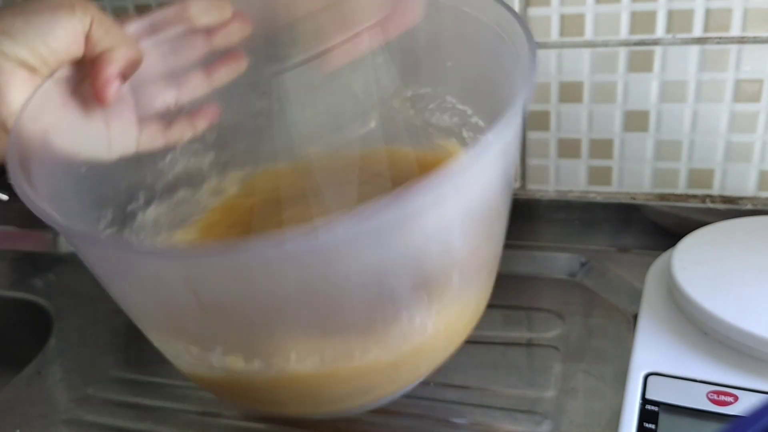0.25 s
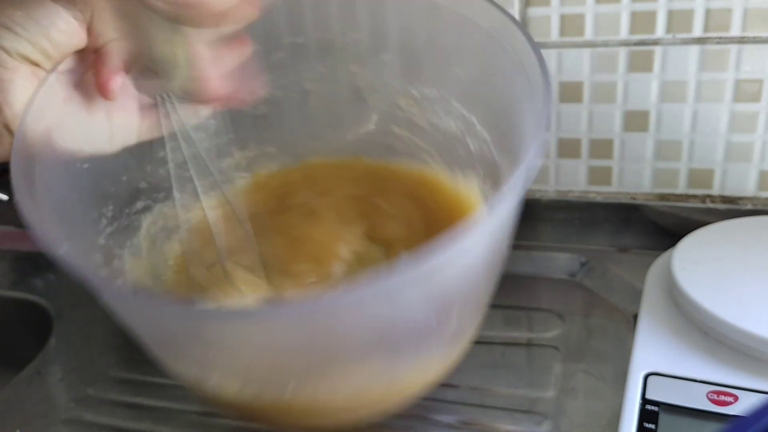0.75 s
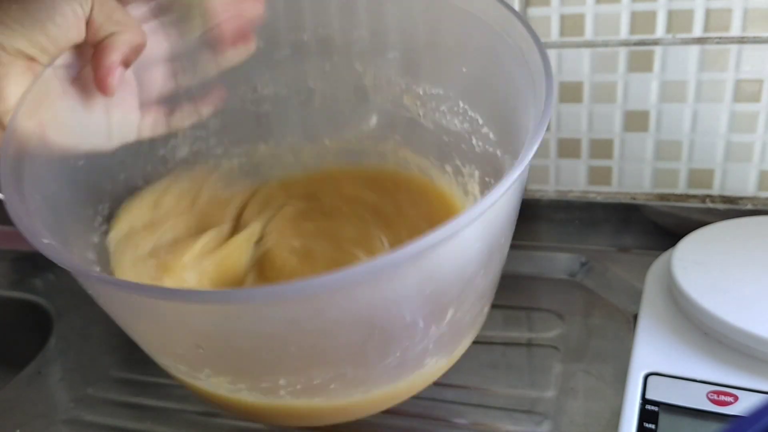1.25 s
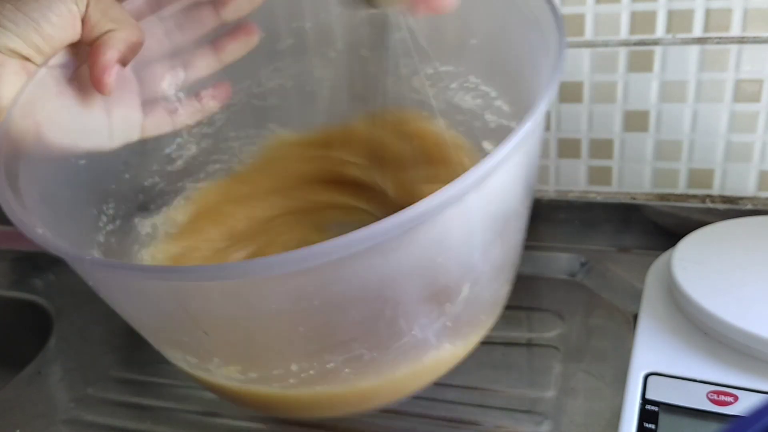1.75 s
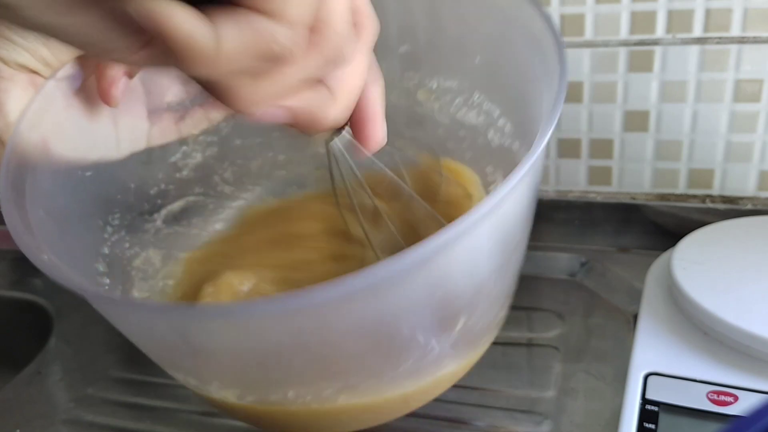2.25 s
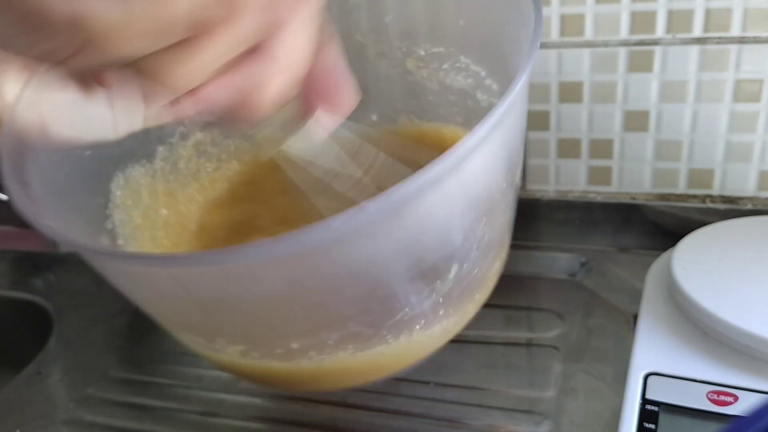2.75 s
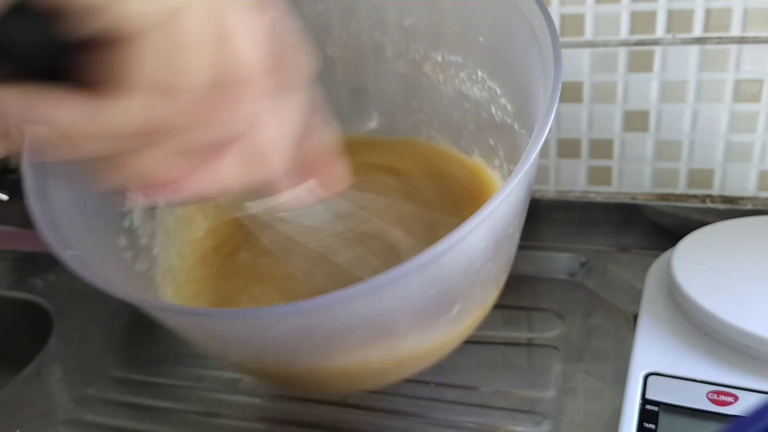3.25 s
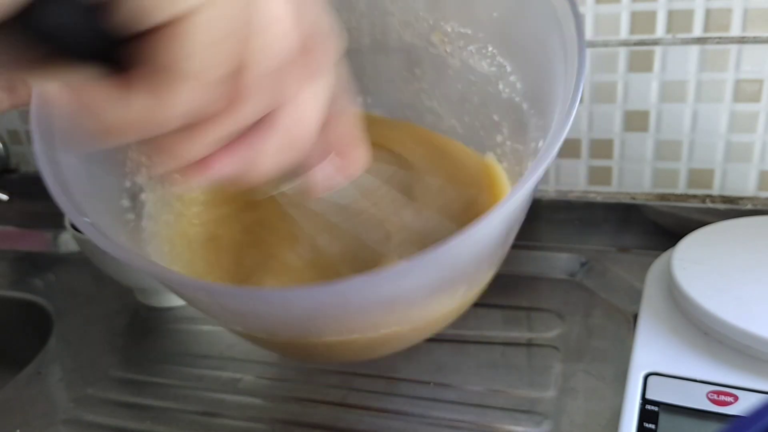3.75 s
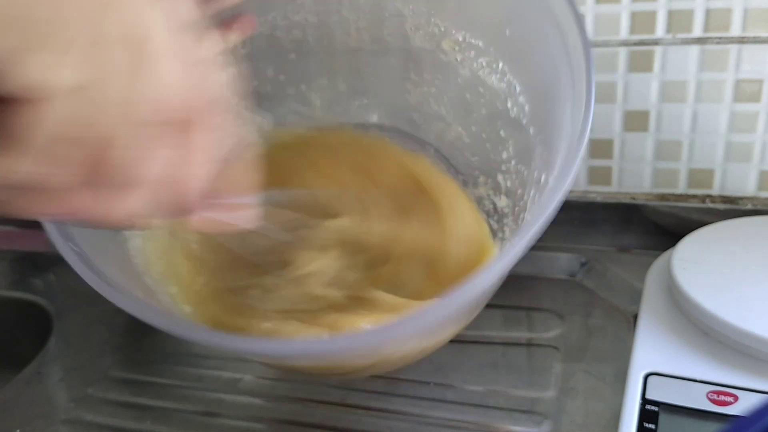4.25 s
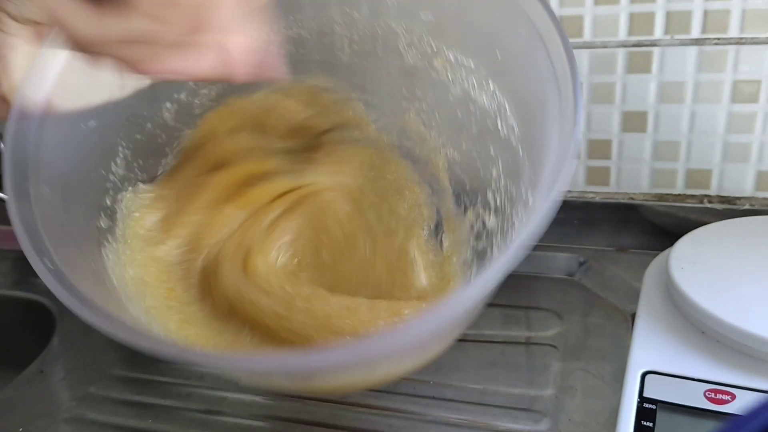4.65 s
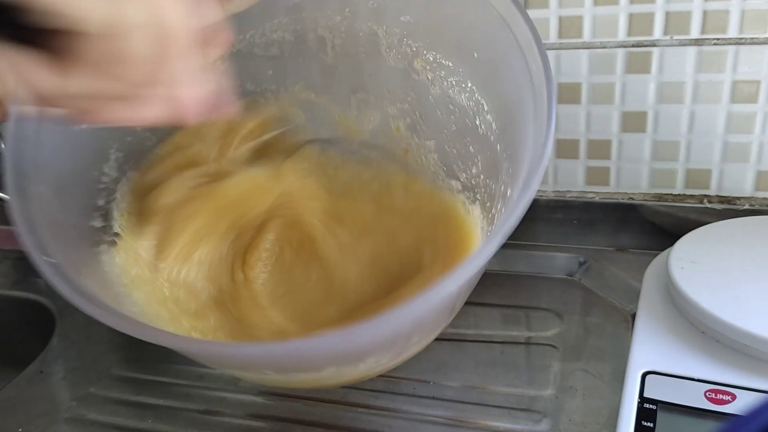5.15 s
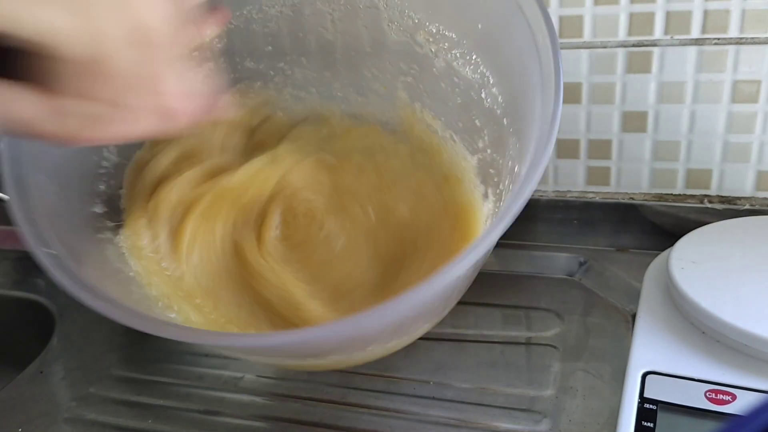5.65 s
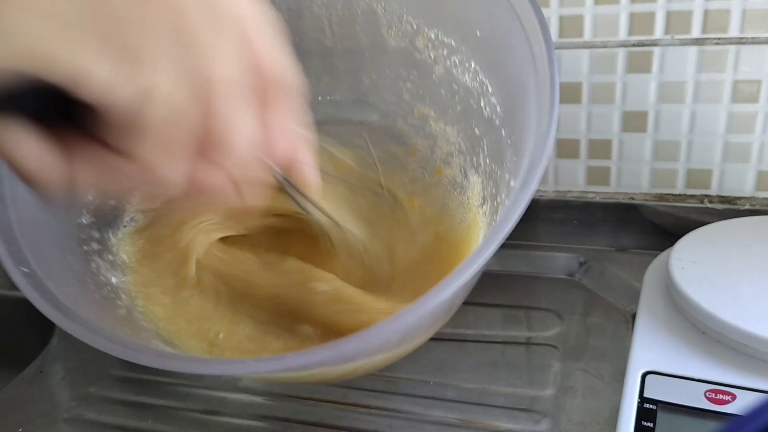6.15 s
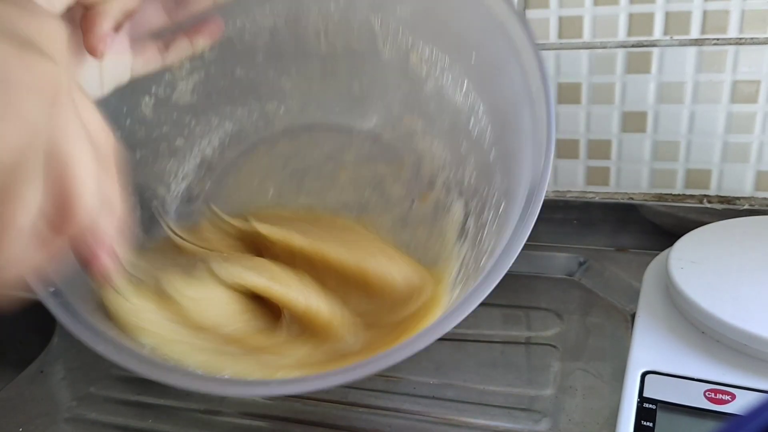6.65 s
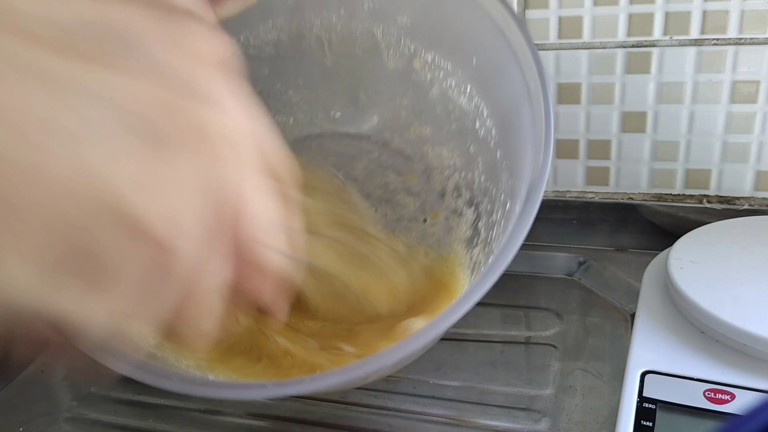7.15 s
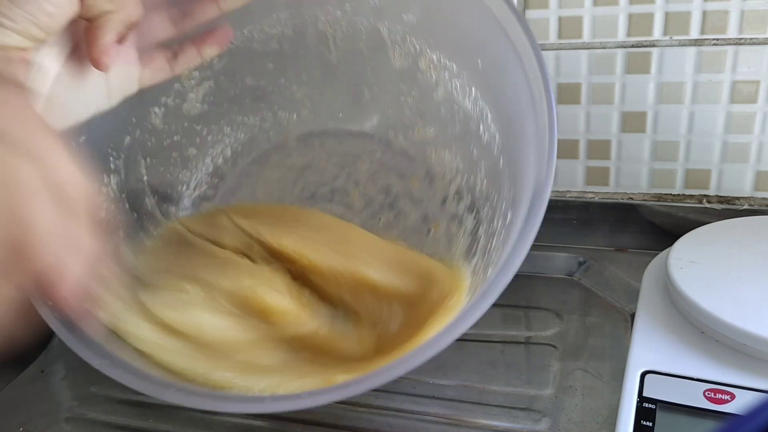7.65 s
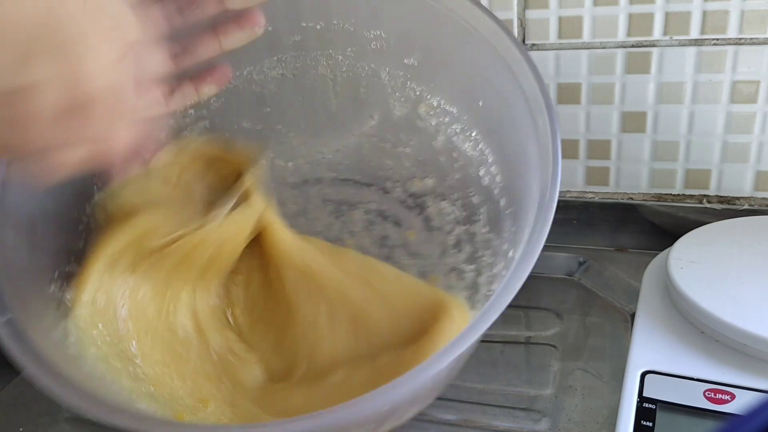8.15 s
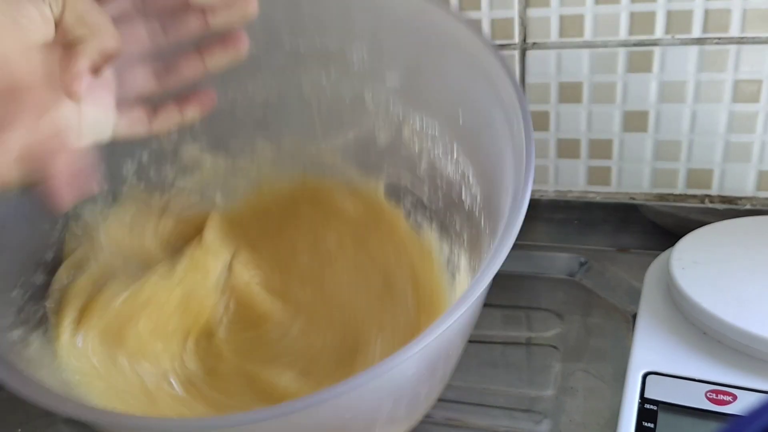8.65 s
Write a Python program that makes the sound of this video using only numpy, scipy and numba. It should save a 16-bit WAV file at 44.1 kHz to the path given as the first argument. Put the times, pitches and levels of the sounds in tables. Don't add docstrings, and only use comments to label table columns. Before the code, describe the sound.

In a small tiled kitchen, close to the microphone, metal wires slap and scrape a hollow plastic bowl with grainy, wet crunching. The brisk, loud beating eases into steady rasping swishes, with one strong boomy bump on the steel beneath. Later, short pulsing folds slap more densely and lower, before beating returns. Brief hollow rings, a very short room tail, faint steady hum and slightly dull treble.

```python
import sys
import numpy as np
from scipy import signal
from scipy.fft import rfft, irfft
from scipy.io import wavfile
from scipy.ndimage import uniform_filter1d, map_coordinates
from numba import njit

SR = 44100
rng = np.random.default_rng(int(sys.argv[2]) if len(sys.argv) > 2 else 0)


def invert_db(level):
    return 10 ** (np.asarray(level, dtype=float) / 20)


def generate_wav(signal):
    frames = np.transpose(np.atleast_2d(signal))
    scaled = np.clip(frames, -1, 1) * 32767
    pcm = np.round(scaled).astype(np.int16)
    wavfile.write(sys.argv[1], SR, pcm)


N = 392049


def colour(x, points):
    hz, db = np.transpose(points)
    grid_hz = np.fft.rfftfreq(4096, 1 / SR) + 1
    cepstrum = irfft(np.log(invert_db(np.interp(np.log(grid_hz), np.log(hz), db))))
    cepstrum[1:2048] *= 2
    cepstrum[2049:] = 0
    response = irfft(np.exp(rfft(cepstrum)))[:2048]
    return signal.fftconvolve(x, response)[:N]


def unit(x):
    return x / np.sqrt(np.mean(x ** 2))


def walk(rate_hz):
    hold = int(SR / rate_hz)
    levels = rng.standard_normal(N // 20 + 1)[:N // hold + 1]
    return 1.2 * uniform_filter1d(np.repeat(levels, hold), hold)[:N]


def follow(table):
    return np.interp(np.arange(N) / SR, *np.transpose(table))


@njit
def svf(x, hz, width):
    y, band, low = np.empty(len(x)), 0., 0.
    for i in range(len(x)):
        g, k = np.tan(np.pi * hz[i] / SR), width / hz[i]
        v = (band + g * (x[i] - low)) / (1 + g * (g + k))
        band, low, y[i] = 2 * v - band, low + 2 * g * v, k * v
    return y


# (pitch_hz, level_db per Hz)
HUM_COLOUR = [(15, -47.5), (25, -8.5), (280, -8.5), (513, -3.5), (771, -9), (1190, -0.5), (1440, -12.5),
              (2680, -13.5), (4030, -26.5), (7700, -21), (10000, -43), (16900, -120)]


def kitchen_hum(level_db=-48.5):
    return unit(colour(rng.standard_normal(N), HUM_COLOUR)) * invert_db(level_db)


def room(x, t60_s=0.1, level_db=-12):
    t = np.arange(int(.5 * SR)) / SR
    decay = np.exp(-np.log(1000) * t / t60_s)
    tail = rng.standard_normal(len(t)) * decay * (t > .004)
    return invert_db(level_db) * signal.fftconvolve(x, tail / np.sqrt(np.sum(tail ** 2)))[:N]


# (start_s, level_db, ring_share 0-1, worktop_thud_db)
BUMPS = [(0.558, -48, 0.5, -1), (0.926, -40, 0.65, -28), (1.017, -24, 0.06, -20.5), (1.38, -27.5, 0.1, -18),
         (1.602, -46.5, 0.75, -11), (1.849, -45, 0.3, -19), (2.081, -34.5, 0.17, -21),
         (2.302, -33.5, 0.1, -32), (2.542, -29, 0.05, -28), (3.2924, -12.5, 0.83, -41),
         (4.763, -42, 0.4, -30.5), (4.935, -36, 0.22, -18), (6.391, -49, 0.4, -5), (6.994, -51, 0, -21),
         (8.454, -26, 0.24, -16)]
# (pitch_hz, level_db, t60_s)
STEEL_MODES = [(108, 4, 0.39), (130.5, -6.5, 0.6), (166.5, -2, 0.35), (188, -4.5, 0.52), (222.3, 8, 0.2),
               (239, -4, 0.55), (308, -7, 0.25), (323.4, -3, 0.3), (430, -8, 0.3), (394, -10.5, 0.13),
               (810, -17, 0.074), (660, -18.5, 0.08)]


def steel(late=0.34, thud_hz=55, thud_s=0.039, rattle=0.61, rattle_db=2, swell=0.33):
    t = np.arange(int(.6 * SR)) / SR
    out = np.zeros(N + len(t))
    open_sheet = signal.butter(3, 85, "high", fs=SR, output="sos")
    waver = [(rattle * walk(25)[:len(t)], invert_db(rattle_db * walk(33)[:len(t)])) for _ in STEEL_MODES]
    grow = np.minimum(t / .03, 1)
    for s, db, ring, thud_db in BUMPS:
        thud = invert_db(thud_db + 9.5) * np.sin(2 * np.pi * thud_hz * t) * np.exp(-t / thud_s)
        ringing = 0
        for (hz, mode_db, t60_s), (slip, gain) in zip(STEEL_MODES, waver):
            since = np.maximum(t - late / hz, 0)
            rise = 1 - np.exp(-since * hz / swell)
            decay = np.exp(-np.log(1000) * since / (t60_s * np.clip(ring, .05, 1.5)))
            wave = np.sin(2 * np.pi * hz * since + grow * slip)
            ringing = ringing - invert_db(mode_db) * gain ** grow * rise * wave * decay
        at = int(s * SR)
        out[at:at + len(t)] += invert_db(db - 4.0) * (thud + signal.sosfilt(open_sheet, ringing))
    return out[:N]


# (start_s, pitch_hz, level_db, length_s)
RINGS = [(0.178, 488, -18.5, 0.028), (0.187, 2333, -22, 0.032), (0.271, 1280, -24, 0.021),
         (0.496, 1325, -12.5, 0.016), (0.691, 1230, -23.5, 0.05), (0.929, 1270, -21, 0.024),
         (1.036, 1252, -22, 0.051), (1.392, 1870, -25, 0.04), (1.383, 1307, -24, .018),
         (1.487, 1257, -27, 0.071), (1.617, 1790, -23, 0.026), (1.844, 1320, -37, 0.026),
         (1.926, 1277, -30, 0.035), (2.267, 1206, -18.5, 0.035), (2.299, 590, -29, 0.036),
         (2.304, 2230, -25, 0.025), (2.384, 1244, -29, 0.032), (2.483, 1122, -26, 0.024),
         (2.597, 1240, -21.5, 0.036), (2.998, 1163, -29.5, 0.054), (3.357, 1228, -19.5, 0.022),
         (3.785, 551, -36.5, 0.13), (4.234, 980, -30, 0.023), (4.299, 540, -26, 0.036),
         (4.293, 517, -38, 0.17), (4.954, 2585, -26, 0.024), (4.948, 1210, -29.5, 0.063),
         (5.332, 1212, -35, 0.11), (5.843, 1240, -35, 0.15), (5.855, 507, -24.5, 0.017),
         (6.144, 1265, -22.5, 0.026), (6.393, 885, -30, 0.02), (6.391, 2700, -30, 0.019),
         (6.395, 1247, -29, 0.058), (0.377, 480, -22.5, 0.026), (6.795, 557, -29, 0.048),
         (6.867, 1225, -29, 0.032), (6.893, 2270, -26, 0.022), (7.004, 1135, -23, 0.02),
         (7.475, 1250, -30, 0.025), (0.162, 404, -22, 0.02), (7.873, 1220, -29, 0.03),
         (7.874, 2180, -42, 0.021), (7.861, 2770, -29, 0.028), (8.02, 516, -38.5, 0.11),
         (8.441, 580, -27.5, 0.056), (0.583, 500, -26.5, 0.021), (0.806, 530, -24, 0.026),
         (8.689, 1290, -24, 0.015)]


def rings(rise_s=0.0022, fall_share=0.45, wobble=0.017, rough_db=3.0):
    t = np.arange(int(.2 * SR)) / SR
    waver = 1 + wobble * walk(70)
    rough = invert_db(rough_db * walk(110))
    out = np.zeros(N)
    for s, hz, db, length_s in RINGS:
        at = slice(int(s * SR), int(s * SR) + len(t))
        fall = np.exp(-np.maximum(t - .5 * length_s, 0) / (fall_share * length_s))
        shape = (1 - np.exp(-t / rise_s)) ** 2 * fall
        out[at] += invert_db(db) * shape * rough[at] * np.sin(2 * np.pi * hz * np.cumsum(waver[at]) / SR)
    return out


# (start_s, level_db, heaviness_db, brightness_db)
BEAT_SLAPS = [(0.0657, -5.5, -19, -14), (0.024, -19, -19, -12), (0.1553, -7, -21, 3.5),
              (0.183, -10, -19, 2), (0.192, -16, -7, -4), (0.203, -14, -22, 7.5), (0.2095, -17, -24, 6.5),
              (0.2503, -14, -4.5, -6), (0.2767, -12, -20, -10), (0.303, -11, -19, 10),
              (0.322, -22, -11, -3), (0.3637, -21, -3, -14), (0.398, -5, -24, -14), (0.428, -11.5, -32, 10),
              (0.452, -10, -25, 2), (0.4914, -4.5, -18, -11), (0.4987, -1, -34, -16),
              (0.592, -14.5, -8.5, -6), (0.605, -24, -20, -16), (0.634, -14.5, -17, 13.5),
              (0.7007, -0.5, -27, -36), (0.7492, -19.5, -20, 11), (0.7941, -8, -15, -6),
              (0.812, -18, -4, -9), (0.861, -26.5, -31, 18.5), (0.8904, -23, -21, -7.5),
              (0.9275, 2.5, -20, -19), (1.0176, -6.5, -29, 0), (1.049, -9, -27, 4), (1.082, -16, -29.5, -9),
              (1.1513, -2, -17.5, -10), (1.28, -6.5, -27, -20), (1.3924, -5.5, -14.5, -4),
              (1.49, -4.5, -19, -19), (1.5300, -21, -16, 18.5), (1.6079, -5.5, -15, -8.5),
              (1.7015, -14, -4, -2), (1.7565, -15, -16, -6), (1.807, -13, -17, -14), (1.838, -5, -20, -6),
              (1.9949, -22, -27, 12), (2.0438, -14, -14, -3), (2.0773, -9.5, -33, 5),
              (2.1614, -18.5, -10.5, 5)]
STIR_SLAPS = [(2.27, -19, -39, -30), (2.2855, -9, -20, -17), (2.303, -1.5, -11.5, -2.5),
              (2.35, -15.5, -27, 4), (2.386, -11, -8, -4.5), (2.4895, -20.5, -11, -7),
              (2.496, -17, -15, -14), (2.527, -7.5, -20, 0), (2.5966, -18.5, -5, -28),
              (2.637, -20, -16, -18), (2.9116, -19, -19, 1.5), (3.009, -19, -12, -3),
              (3.227, -13.5, -22, -14), (3.295, -8, -1.5, -48), (3.367, -5.5, -32, -40),
              (3.692, -14, -27, -11), (3.817, -33, -25, 2), (3.874, -7.5, -17.5, -29),
              (3.9536, -26, -10, 11), (3.9783, -18, -9, -4), (4.1334, -22, -18, -1), (4.245, -11, -23, -7),
              (4.3057, -26, -3, -5), (4.4987, -22, -9, -16), (4.514, -31, -17, -8), (4.542, -31, -17, -3),
              (4.585, -20, -17, 4), (4.7583, -11.5, -3.5, -9.5), (4.7849, -18, 2, -28),
              (4.9512, -18.5, -2, 19), (4.907, -15, -17, -6), (5.1118, -17.5, -12, -14),
              (5.143, -26, -32, -13), (5.239, -28.5, -18, 6), (5.412, -28, -7, -12), (5.4995, -33, -22, 3),
              (5.5116, -30, -21, 4), (5.666, -27, 1, -11), (5.7243, -21, -21, 0), (5.7537, -19, -14, 2.5),
              (5.908, -14, -28, -8), (6.0198, -14, -26, -3), (6.0427, -18.5, -24, 8), (6.136, -18, -9, -23),
              (6.171, -33, -14, -16)]
FOLD_SLAPS = [(6.2754, -14.5, -35, 3.5), (6.296, -29.5, -20, 6), (6.391, -1, -23.5, -14),
              (6.4885, -30.5, -2, 17.5), (6.569, -30.5, 7, -2), (6.5986, -2, -26, -26.5),
              (6.637, -25, 5, -1), (6.674, -16.5, -11, 9), (6.7788, -27, 8, -5), (6.789, -25.5, 1, -23),
              (6.8068, -8.5, -7.5, -10), (6.8476, -29, -12, -10), (6.864, -14.5, -5.5, -12),
              (6.8727, -10, -29, -20), (6.894, -11, -19, -5), (6.984, -26, 4, -3), (6.992, -18, 2, -8),
              (7.0066, -8.5, -1, -16), (7.0558, -10.5, -11, -7), (7.188, -26, 1, 0),
              (7.1957, -20.5, 22, -13), (7.208, -9, -4, -28), (7.2582, -6.5, -14, -21),
              (7.3977, -16, -5.5, -11), (7.417, -9.5, 2, -12), (7.4449, -22, -10, -6), (7.485, -14, -11, 0),
              (7.6067, -16, 4, -10), (7.616, -18, -3, 5), (7.625, -22, -9, -11), (7.665, -12, -23, -1.5),
              (7.6804, -14, -29, 4), (7.695, -14, -25, -11), (7.8086, -9, -8.5, -15), (7.82, -11, -23, -11),
              (7.868, -8, -22, -9), (7.88, -9, -14, -6), (8.0107, -19, 15, -6), (8.0241, -12.5, -1, -1),
              (8.0718, -9, -3, -11), (8.0976, -18, -3, -13), (8.225, -10, -12, -30),
              (8.237, -3.5, -18, -25), (8.286, -23, -5, 1)]
LAST_SLAPS = [(8.309, -12, -17, -7), (8.327, -10.5, -15, -22), (8.355, -15, -10, 0), (8.388, -17, -12, -6),
              (8.4421, -10.5, 5, 3.5), (8.463, -7, -16, 3), (8.485, -6, -15, -4.5),
              (8.512, -17.5, -17, 9.5), (8.5578, -14, -27, -4), (8.5798, -12, -3.5, -2),
              (8.594, -13.5, -27, 4.5), (8.633, -9, -10, -13), (8.692, -9.5, -7, 0.5), (8.71, -20, -14, 6),
              (8.7511, -19.5, -22, 7.5), (8.832, -7.5, -31, -11), (8.864, -17.5, -10, 3)]
SLAPS = BEAT_SLAPS + STIR_SLAPS + FOLD_SLAPS + LAST_SLAPS


def slaps(rise_s=0.0006, tick_s=0.003, tick_db=4, skid_s=0.01, snap_db=7, snap_s=0.00006):
    t = np.arange(int(.08 * SR)) / SR
    tick_and_skid = invert_db(tick_db) * np.exp(-t / tick_s) + np.exp(-t / skid_s)
    shape = (1 - np.exp(-t / rise_s)) * tick_and_skid
    snap = invert_db(snap_db) * np.exp(-np.abs(t - .0008) / snap_s)
    force = np.zeros((5, N + len(t)))
    grit = np.sign(rng.standard_normal(N + len(t)))
    for s, db, heavy_db, bright_db in SLAPS:
        share_db = np.array([.5 * heavy_db + 5, min(heavy_db, 0) + 9, -4, bright_db, 0.27 * bright_db - 3.5])
        at = slice(int(s * SR), int(s * SR) + len(t))
        push = shape * grit[at] + snap * grit[at][0]
        force[:, at] += invert_db(db + share_db - 11.0)[:, None] * push
    return force[:, :N]


def lift(depth_db=-0.5, lead_s=0.015):
    marks = np.zeros(N)
    marks[(np.array(SLAPS)[:, 0] * SR).astype(int)] = 1
    ramp = np.linspace(1, 0, int(lead_s * SR))
    return depth_db * np.minimum(signal.fftconvolve(marks[::-1], ramp)[:N][::-1], 1)


# (landing_s, depth_db)
LIFTS = [
    (0.27, -3),
    (1.79, -6.5),
    (2.16, -8),
    (4.5, -6),
    (4.757, -14.5),
    (5.497, -4),
    (6.272, -11),
]


def leave(span_s=0.045):
    t = np.arange(N) / SR
    return sum(db * np.clip(1 - (s - t) / span_s, 0, 1) ** .5 * (t < s) for s, db in LIFTS)


def sugar(rate_hz=4000, spread_db=2.0, hiss=0.59, patchy_db=1.04, clump_db=2.5):
    chance, size, sign = rng.random(N), rng.exponential(size=N), rng.standard_normal(N)
    cracks = (chance < rate_hz / SR) * invert_db(spread_db * size) * np.sign(sign)
    grit = unit(cracks) + hiss * rng.standard_normal(N)
    grit = grit * invert_db(patchy_db * walk(90))
    return np.array([unit(grit * invert_db(clump_db * walk(60))) for _ in range(5)])


def shares(heavy_db, bright_db, crisp_db):
    return np.array([0.67 * heavy_db, heavy_db + 0.5, 0, bright_db - 3.5, crisp_db + 4])


# (start_s, near_level_db, delay_s, far_level_db, brightness_db)
BEAT_TURNS = [(-.05, -18.5, 0.096, -33, 0.5), (.165, -28.5, 0.076, -24, 1.5),
              (.375, -27.5, 0.087, -27.5, 2.5), (.59, -28, 0.071, -23.5, 3), (.8, -28.5, 0.17, -26.5, 2.5),
              (1.025, -26, 0.12, -27, 0), (1.26, -29.5, 0.16, -28.5, 2), (1.48, -30, 0.13, -30.5, 1.5),
              (1.71, -28, 0.099, -27.5, -1.5), (1.94, -32, 0.12, -28.5, 1), (2.165, -32, 0.08, -27, -6.5),
              (2.385, -31.5, 0.1, -31, -4), (8.44, -35.5, 0.1, -27.5, 2.5), (8.69, -27, 0.11, -27, -5.5)]
STIR_TURNS = [(2.5, -37, 0.098, -31.5, 1), (2.74, -39, 0.12, -29, -3), (2.99, -34.5, 0.13, -30, -5.5),
              (3.23, -34.5, 0.14, -30, -4), (3.46, -34.5, 0.15, -30.5, -4.5), (3.7, -36.5, 0.15, -29, -1),
              (3.94, -33.5, 0.17, -31, -3), (4.23, -36, 0.12, -27.5, -4.5), (4.5, -32.5, 0.08, -31.5, -1.5),
              (4.755, -38.5, 0.15, -26.5, 3), (5., -39, 0.11, -25.5, -4), (5.24, -35.5, 0.15, -30.5, -1.5),
              (5.5, -33.5, 0.15, -29.5, -1.5), (5.75, -37, 0.13, -29, 0.5), (6.01, -35, 0.11, -29.5, -3.5)]
FOLD_TURNS = [(6.272, -74, 0.0015, -61.5, 15), (6.39, -38, 0.073, -50.5, 1.5), (6.6, -39.5, 0.056, -42, 2),
              (6.8, -37, 0.039, -34.5, 0.5), (6.995, -35, 0.041, -36, 1), (7.195, -32, 0.038, -33, -5),
              (7.4, -33, 0.043, -36, 1.5), (7.605, -28.5, 0.054, -37, 0), (7.81, -32, 0.05, -35, -1.5),
              (8.015, -34, 0.058, -38, 1.5), (8.23, -33, 0.061, -35.5, 5)]
# (rise_s, hold_s, fall_s, heaviness_db, brightness_db, crispness_db)
BEAT_SCRAPES = [
    (.01, 0.031, 0.02, -4, 6.5, -7.5),
    (0.023, 0.032, 0.025, -1, 6, -5.5),
]
STIR_SCRAPES = [
    (0.007, 0.032, 0.099, -8.5, 3.5, -5),
    (0.029, 0.04, 0.032, -24.5, -1.5, -2.5),
]
FOLD_SCRAPES = [
    (.004, 0.039, 0.036, 5, -11.5, -9),
    (.01, 0.044, 0.04, -3, 6.5, -2),
]
# (level_db next to the scrapes, heaviness_db, brightness_db, crispness_db)
BEAT_TRAIL = (-7.5, -1.5, 6, -5.5)
STIR_TRAIL = (-4, -3, 1, -10)
FOLD_TRAIL = (-22, 3, 7, -2.5)
STYLES = [(BEAT_TURNS, BEAT_SCRAPES, BEAT_TRAIL),
          (STIR_TURNS, STIR_SCRAPES, STIR_TRAIL),
          (FOLD_TURNS, FOLD_SCRAPES, FOLD_TRAIL)]


def drag(crisp_share=0.47):
    t = np.arange(int(.3 * SR)) / SR
    lead = int(.1 * SR)
    power = np.zeros((5, lead + N + len(t)))
    trail = []
    for turns, scrapes, (under_db, *tone_db) in STYLES:
        for s, near_db, delay_s, far_db, tilt_db in turns:
            tilt = tilt_db * np.array([0, 0, 0, 1, crisp_share])
            trail.append([s, *(.5 * (near_db + far_db) + under_db + shares(*tone_db) + tilt)])
            passes = zip((s, s + delay_s), (near_db, far_db), scrapes)
            for start_s, db, (rise_s, hold_s, fall_s, *colour_db) in passes:
                shape = (1 - np.exp(-t / rise_s)) ** 2 * np.exp(-np.maximum(t - hold_s, 0) / fall_s)
                level = invert_db(db + shares(*colour_db) + tilt)[:, None]
                at = max(lead + int(start_s * SR), 0)
                power[:, at:at + len(t)] += (level * shape) ** 2
    starts, *trail_db = np.transpose(sorted(trail))
    current = np.clip(np.searchsorted(starts, np.arange(N) / SR) - 1, 0, len(starts) - 1)
    held_db = np.array([db[current] for db in trail_db])
    trail_level = invert_db(uniform_filter1d(held_db, 800, axis=1))
    return np.sqrt(power[:, lead:lead + N] + trail_level ** 2)


EDGES_HZ = [250, 800, 1600, 3600]


def parts(force):
    kinds = [(EDGES_HZ[0], "low")]
    kinds += [(EDGES_HZ[k:k + 2], "band") for k in range(3)]
    kinds += [(EDGES_HZ[3], "high")]
    total = 0
    for k, (x, (hz, kind)) in enumerate(zip(force, kinds)):
        sos = signal.butter(2, hz, kind, fs=SR, output="sos")
        total = total + (-1) ** k * signal.sosfilt(sos, x)
    return total


def far_wall(x, turn, from_hz=1400, echo_s=.0018, swing=0.08, shortest_turns=0.054, level_db=-9.5):
    circling = 1 - swing * np.cos(2 * np.pi * (turn - shortest_turns))
    delay_s = echo_s * (circling + 0.046 * walk(12))
    treble = signal.sosfiltfilt(signal.butter(2, from_hz, "high", fs=SR, output="sos"), x)
    return invert_db(level_db) * map_coordinates(treble, [np.arange(N) - delay_s * SR], order=3, mode="nearest")


# (pitch_hz, level_db per Hz)
BODY = [(24, -53), (50, -17.5), (320, -12.5), (386, -10), (460, -10), (514, -4.5), (764, -12),
        (1060, -11.5), (1270, -8), (1450, -10.5), (2740, -9), (3720, -20), (5660, -21), (6460, -11),
        (7700, -15.5), (10000, -66), (16900, -120)]
# (pitch_hz, width_hz, level_db over the body, swing_db with the whisk's place, best_place_turns,
# load_shift share of pitch)
BOWL_MODES = [(940, 85, 8.5, 4., .12, -.12), (1235, 80, 15, 3.5, .6, .065), (535, 50, 10.5, 5., .62, .06),
              (385, 45, 6, 4., .6, .01), (592, 35, 3, 2., .6, .01), (1660, 150, 7.5, 4., .15, -.09),
              (2200, 180, 0.5, 3., .45, .04), (2740, 170, 1.5, 5., .2, -.025), (5150, 300, 1, 2., .3, .01),
              (6400, 500, 0, 1., .3, .02), (760, 140, -10.5, 2., .1, .02)]
# (flat_level_db, tipped_level_db, flat_swing_db,
# flat_best_place_turns, flat_pitch_lift share)
POSE = [(-2.5, -9, 5, 0.25, 0.066), (0.5, -6.5, 1.5, 0.49, 0.036), (-2.5, -12, 2, 0.12, 0.0068),
        (2, -4, 2.5, 0, 0.024), (-11.5, -4, 1, .2, 0.052), (-0.5, 1, 7, 0.77, 0.11),
        (1.5, 8, -1, 0.81, 0.022), (-2, -1, -0.5, 1, -0.063), (5, 4.7, 2.5, 0.26, -0.0098),
        (0.6, -0.5, -3.5, 0.43, -0.082), (20, -13, 5, 0.0094, 0.059)]
# (start_s, flatness 0-1)
FLAT = [
    (2.2, 1),
    (2.6, 0),
]
# (start_s, tip 0-1)
TIPPED = [
    (6.6, 0),
    (6.8, 1),
    (8.4, 1),
    (8.5, .4),
]
# (pitch_hz, width_hz, depth 0-1, swing 0-1,
# deepest_place_turns)
DEAD_SPOT = (740, 190, .68, .28, .6)


def bowl(force):
    starts = sorted(row[0] for turns, *_ in STYLES for row in turns) + [N / SR + .02]
    turn = np.interp(np.arange(N) / SR, starts, np.arange(len(starts)))
    load = uniform_filter1d(1 - 2 * (turn % 1), 1500)
    flat, tip = follow(FLAT), follow(TIPPED)

    dead_hz, dead_width, depth, swing, deepest = DEAD_SPOT
    swallowed = depth + swing * np.cos(2 * np.pi * (turn - deepest))
    dead = swallowed * svf(force, np.full(N, 1. * dead_hz), 1. * dead_width)
    out = (force - dead) * invert_db(4.5)

    for mode, pose in zip(BOWL_MODES, POSE):
        hz, width, db, swing_db, best, shift = mode
        flat_db, tip_db, flat_swing_db, flat_best, flat_lift = pose
        place_db = (1 - flat) * swing_db * np.cos(2 * np.pi * (turn - best))
        place_db = place_db + flat * flat_swing_db * np.cos(2 * np.pi * (turn - flat_best))
        drive_db = db + flat_db * flat + tip_db * tip + place_db + 2.9 * walk(40)
        load_shift = shift * load * (1 - .6 * flat)
        wander = .016 * (1.3 + 1.2 * (hz > 1500)) * walk(12)
        moving_hz = hz * (1 - load_shift + flat_lift * flat + wander)
        out = out + svf(force * invert_db(drive_db), moving_hz, 1. * width)
    return colour(out + far_wall(out, turn), BODY)


def scene():
    force = sugar() * drag() * invert_db(lift() + leave() + 7.0) + slaps()
    force[0] *= invert_db(-5 * follow(TIPPED))
    near = bowl(parts(force)) * invert_db(4.5) + steel() + rings()
    return np.tile(near + room(near) + kitchen_hum(), (2, 1))


def noisy_treble(dry, frame=1024):
    out = dry.copy()
    # (low_hz, high_hz, share of time)
    for lo_hz, hi_hz, share in [(3600, 4300, .015), (4300, 5200, .06), (5200, 6100, .12),
                                (6100, 6900, .13), (6900, 7200, .02)]:
        sos = signal.butter(4, [lo_hz, hi_hz], "band", fs=SR, output="sos")
        band = signal.sosfiltfilt(sos, dry[0])
        chosen = 1. * (rng.random(N // (2 * frame) + 1) < share)
        swap = uniform_filter1d(np.repeat(chosen, 2 * frame)[:N], frame // 2)
        swap = np.clip(swap, 0, 1)
        strength = np.sqrt(uniform_filter1d(band ** 2, frame // 8) + 1e-18)
        noise = unit(signal.sosfiltfilt(sos, rng.standard_normal((2, N)))) * strength
        out = out + np.sqrt(swap) * noise - (1 - np.sqrt(1 - swap)) * band
    return out


def low_pass(x):
    return signal.sosfilt(signal.butter(12, 8720, fs=SR, output="sos"), x)


def record(dry):
    steep_cut = signal.ellip(10, .2, 62, 7660, fs=SR, output="sos")
    mix = signal.sosfilt(steep_cut, noisy_treble(dry))
    return low_pass(mix)


dry = scene()
out = record(dry)
generate_wav(out)
```